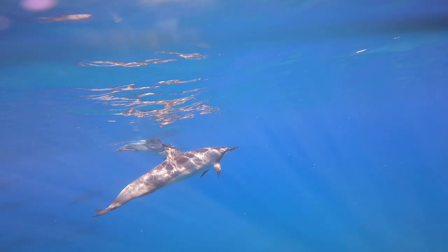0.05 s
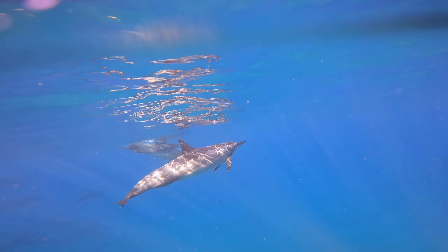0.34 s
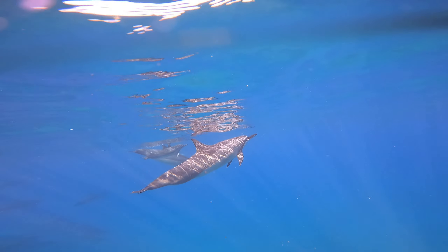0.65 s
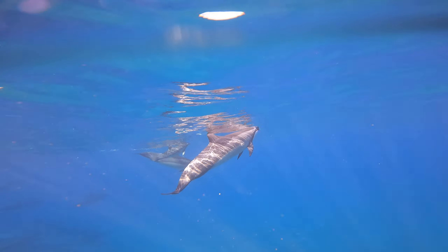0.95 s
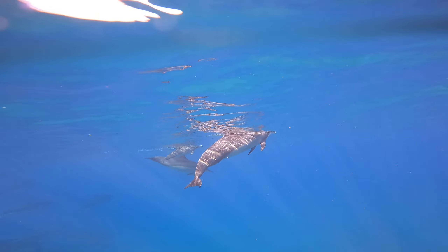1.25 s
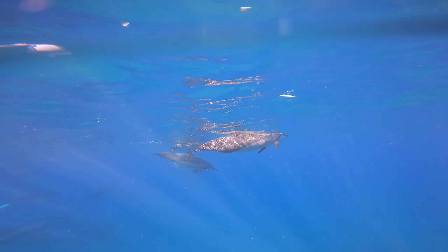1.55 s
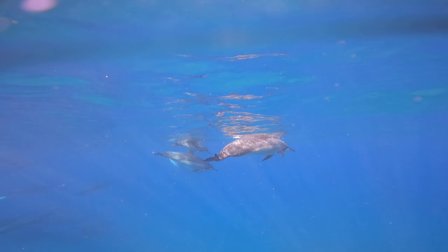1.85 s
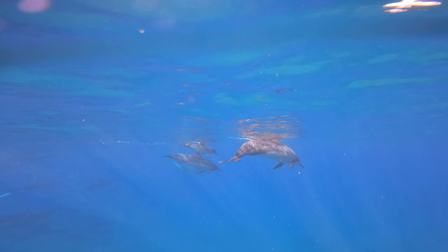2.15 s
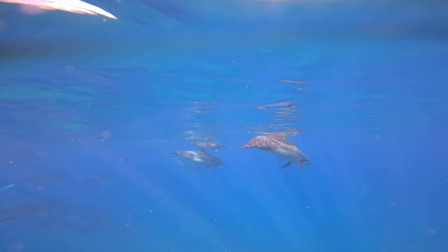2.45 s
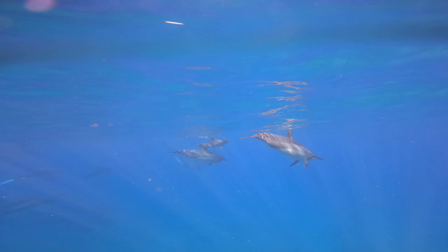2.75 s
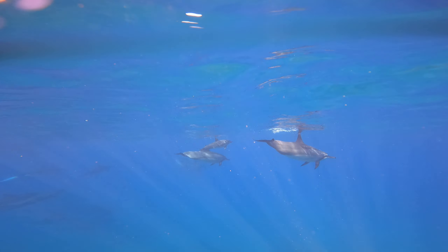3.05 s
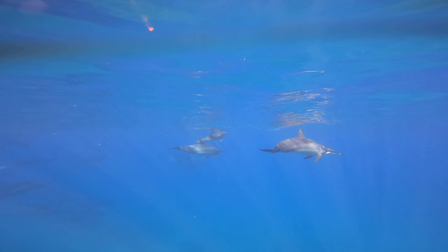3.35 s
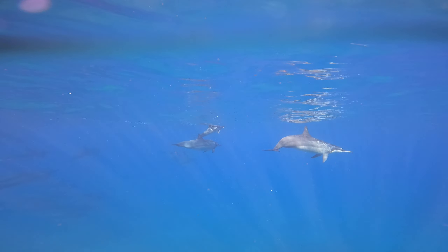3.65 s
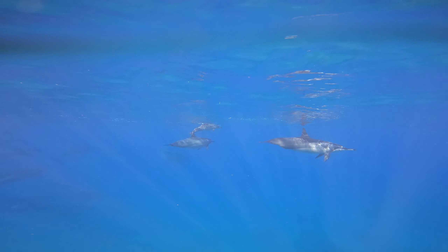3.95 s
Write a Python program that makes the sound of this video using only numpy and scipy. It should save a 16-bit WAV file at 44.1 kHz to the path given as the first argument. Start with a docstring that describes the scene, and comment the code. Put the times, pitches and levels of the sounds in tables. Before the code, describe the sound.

Dolphins whistle and click underwater over a low rumble of moving water.

```python
"""Dolphins just under the surface

Open water, heard from two microphones in a camera housing held just below the sea surface.
Passing dolphins whistle in upward sweeps, buzz twice and send out a train of sonar clicks.
Water rumbles, washes and knocks round the housing; snaps and bubbles crackle near and far.
At the end a splash breaks close by."""
import sys
import numpy as np
from scipy import signal
from scipy.fft import rfft, irfft, next_fast_len
from scipy.io import wavfile
from scipy.ndimage import uniform_filter1d

SR = 44100
rng = np.random.default_rng(int(sys.argv[2]) if len(sys.argv) > 2 else 0)


def file_out(sig):
    """Save sig as 16-bit WAV at sys.argv[1]."""
    # one column per channel
    cols = np.atleast_2d(sig).T
    # limit, then scale
    lim = np.clip(cols, -1, 1)
    pcm = np.round(lim * 32767).astype(np.int16)
    wavfile.write(sys.argv[1], SR, pcm)


N = 176400
T = np.arange(N) / SR


def from_db(db):
    """Decibels to gain."""
    return 10 ** (np.asarray(db) / 20)


def unit_rms(x):
    """Scale to unit rms."""
    return x / np.sqrt(np.mean(x ** 2) + 1e-20)


def in_time(rows):
    """Each column of a curve after time_s, sample by sample."""
    time_s, *columns = np.transpose(rows)
    return [np.interp(T, time_s, column) for column in columns]


def gate(rows, edge_s=.003):
    """Open from the first to the last point of a curve, with soft edges."""
    inside_s = np.minimum(T - rows[0][0], rows[-1][0] - T)
    return np.clip(inside_s / edge_s + .5, 0, 1)


def colour(x, points, share=1):
    """Minimum-phase filter that follows a freq_hz, gain_db curve, its decibels scaled by share."""
    size = next_fast_len(x.shape[-1] + 4096, real=True) * 2
    hz, db = np.transpose(points)
    grid_hz = np.maximum(np.arange(size // 2 + 1) * SR / size, 1)
    gain = from_db(share * np.interp(np.log(grid_hz), np.log(hz), db))
    cepstrum = irfft(np.log(gain))
    cepstrum[1:size // 2] *= 2  # fold onto positive time, so nothing rings before its cause
    cepstrum[size // 2 + 1:] = 0
    return irfft(rfft(x, size) * np.exp(rfft(cepstrum)))[..., :x.shape[-1]]


def drift(rate_hz):
    """Random wandering of spread 1, mostly slower than rate_hz."""
    hz = np.arange(N // 2 + 1) * SR / N
    return unit_rms(irfft(rfft(rng.standard_normal(N)) / (1 + (hz / rate_hz) ** 2) ** 2, N))


def stereo_noise(side_db=-10):
    """White noise shared by both microphones, plus a weaker opposed part."""
    mid, side = rng.standard_normal((2, N))
    return mid + from_db(side_db) * np.array([side, -side])


def impulses(rows):
    """One impulse for each row of start_s, level_db."""
    start_s, level_db = np.transpose(rows)
    return np.bincount(np.clip(start_s * SR, 0, N - 1).astype(int), from_db(level_db), N)


def soften(x, cutoff_hz):
    """A low-pass rounds off sharp blows."""
    return signal.sosfilt(signal.butter(2, cutoff_hz, fs=SR, output="sos"), x)


def ring(x, pitch_hz, t60_s):
    """One resonance: a unit impulse starts a dying sine of height 1."""
    decay, step = from_db(-60 / (t60_s * SR)), 2 * np.pi * pitch_hz / SR
    return signal.lfilter([0, np.sin(step)], [1, -2 * decay * np.cos(step), decay * decay], x + 1e-18)


def scatter(hits, t60_s):
    """Many paths through water and housing smear each impulse into a short dying burst."""
    decay = from_db(-120 / (t60_s * SR))
    power = signal.lfilter([1], [1, -decay], hits ** 2 + 1e-20)
    return np.sqrt(power) * stereo_noise()


# Lean of each band between the microphones, positive to the left: freq_hz, tilt_db
HOUSING_TILT = [(800, 4.5), (1080, -23), (1350, 7), (3500, 8), (4200, -8), (5600, -1.5), (6950, 1.5),
                (9000, 2.5), (9700, 15), (12000, -3.5)]


def housing(x):
    """The two microphones hear the housing differently: each takes a share of the tilt."""
    left = colour(x[0], HOUSING_TILT, share=0.47)
    right = colour(x[1], HOUSING_TILT, share=-0.3)
    return np.array([left, right])


# Spectrum of the distant sea, all round: freq_hz, gain_db
SEA_SPECTRUM = [(950, -15.5), (1200, -7.5), (1750, -5), (2080, -14), (2350, -10.5), (2780, -13), (3000, -7),
                (3250, -11.5), (4050, -9.5), (4650, 0.5), (5000, 0), (5300, -9), (6200, -3), (6950, -4),
                (7400, -9.5), (8300, -16), (9650, -20.5), (10500, -30.5), (12200, -30), (15500, -66)]


def sea():
    """Countless far snaps make a crackle over a smooth fizz, both fading slightly."""
    snaps_per_s, spread_db, fade_db_per_s = 320, 7, 0.45
    hits = rng.random(N) < snaps_per_s / SR
    strength = from_db(spread_db * np.minimum(rng.exponential(1, N), 2))
    crackle = from_db(-60) * unit_rms(colour(scatter(hits * strength, t60_s=0.028), SEA_SPECTRUM))
    fizz = from_db(-61.5) * unit_rms(colour(stereo_noise(), SEA_SPECTRUM))
    return (crackle + fizz) * from_db(-fade_db_per_s * (T - T.mean()))


# Swell of the eddies right on the housing: time_s, level_db
RUMBLE_SWELL = [(.14, -33), (.35, -25.5), (.6, -33.5), (1.0, -29), (1.24, -33.5), (1.36, -24.5),
                (1.48, -33.5), (1.57, -21.5), (1.7, -21.5), (1.95, -34), (2.17, -28), (2.63, -28.5),
                (3.25, -30), (3.66, -26.5), (3.8, -31.5)]
# Spectrum of their rumble: freq_hz, gain_db
RUMBLE_SPECTRUM = [(12, -31.5), (24, -2), (35, -2), (60, -18), (150, -48), (1500, -140)]
# Spectrum of the churn just above it in pitch: freq_hz, gain_db
CHURN_SPECTRUM = [(65, 0), (115, -5.5), (155, -25.5), (1500, -120)]


def eddies():
    """Eddies press on the housing: a deep swelling rumble and a steady churn, both nearly mono."""
    pressure = colour(stereo_noise(side_db=-33.5), RUMBLE_SPECTRUM)
    pressure /= np.sqrt(uniform_filter1d(pressure[0] ** 2, size=11000))  # level out over 0.25 s
    swell_db, = in_time(RUMBLE_SWELL)
    rumble = from_db(swell_db + 0.5) * pressure
    churn = from_db(-43) * unit_rms(colour(stereo_noise(side_db=-33.5), CHURN_SPECTRUM))
    return rumble + churn


# Water washing past, close to the microphones: time_s, level_db
WASH_SWELL = [(.45, -67), (.66, -58), (1.3, -53.5), (1.51, -66), (1.58, -53), (2.12, -54), (2.35, -65),
              (3.5, -61)]
# Its hollow spectrum: freq_hz, gain_db
WASH_SPECTRUM = [(160, -5.5), (250, -4), (320, 2), (415, 1.5), (462, -15), (700, -31.5), (5000, -100)]


def wash():
    """Water slides round the housing in lumps, gurgling more unevenly as it weakens."""
    swell_db, = in_time(WASH_SWELL)
    depth_db = 2.5 + 0.31 * (swell_db.max() - swell_db)
    gurgle_db = depth_db * np.minimum(drift(rate_hz=18), 1)
    flow = unit_rms(colour(stereo_noise(side_db=-10.5), WASH_SPECTRUM))
    return from_db(swell_db + gurgle_db) * flow


# Dolphin whistles, a little left of centre, one curve each: time_s, pitch_hz, level_db
WHISTLE_CURVES = [
    [(.119, 7400, -53.5), (.14, 7610, -54), (.186, 8700, -60), (.22, 9650, -68.5), (.278, 10850, -81),
     (.345, 12000, -73), (.402, 12600, -88)],
    [(.752, 9700, -58), (.766, 9900, -66), (.787, 12500, -77), (.838, 15300, -90)],
    [(.938, 7500, -56.5), (.962, 8100, -63), (.986, 8450, -60.5), (1.018, 9480, -63), (1.04, 10250, -83)],
    [(1.255, 6980, -62), (1.304, 8540, -58), (1.326, 9440, -68), (1.36, 10350, -72)],
    [(2.148, 9150, -64), (2.154, 9470, -54), (2.162, 11500, -76), (2.235, 15300, -86)],
    [(2.645, 5930, -54.5), (2.682, 8200, -64), (2.72, 9270, -67), (2.76, 10460, -81), (2.82, 12050, -76),
     (2.875, 12900, -90)],
]


def whistles():
    """Rising, wavering pure tones with a faint falling alias, roughened by echoes off the surface."""
    fold_hz, echo_decay_s, pan_db = 12000, 0.0086, 2
    waver_hz = 40 * drift(rate_hz=300)
    flutter = from_db(-0.5 + 2 * drift(rate_hz=150))
    tones = 0
    for curve in WHISTLE_CURVES:
        pitch_hz, level_db = in_time(curve)
        phase = 2 * np.pi * np.cumsum(pitch_hz + waver_hz) / SR
        sweep = from_db(level_db) * np.sin(phase)
        alias = from_db(-89) * np.sin(2 * np.pi * 2 * fold_hz * T - phase)  # mirrored about fold_hz
        tones += np.sqrt(2) * gate(curve) * flutter * (sweep + alias)
    paths = stereo_noise() * np.exp(-T / echo_decay_s)  # ripples overhead give many short paths
    echoes = signal.fftconvolve(tones[None], paths / np.linalg.norm(paths[0]), axes=1)[:, :N]
    return (tones + from_db(-6) * echoes) * from_db([[pan_db], [-pan_db]])


# Deep gulps of water round the housing: start_s, level_db
GULP_HITS = [(.228, -31.5), (.988, -30), (1.305, -37), (1.404, -32), (1.56, -34.5), (2.398, -38),
             (2.565, -29.5), (2.822, -32.5), (3.112, -31.5), (3.699, -27), (3.848, -30)]


def gulps():
    """Larger eddies give the housing a deep push that dies away quickly."""
    pushes = soften(impulses(GULP_HITS), cutoff_hz=238)
    return ring(pushes, pitch_hz=94, t60_s=0.11)


# Bubbles popping at the housing: start_s, level_db
POP_HITS = [(.2558, -49), (.5871, -52), (.6275, -45.5), (1.3269, -47.5), (1.7165, -43)]
# Spectrum of a pop: freq_hz, gain_db
POP_SPECTRUM = [(600, -34), (1300, -0.5), (1750, -0.5), (2100, -11.5), (3000, 3.5), (3300, -10),
                (12000, -37)]


def pops():
    """Each bubble pops in a short, dull burst."""
    return from_db(6.5) * colour(scatter(impulses(POP_HITS), t60_s=0.063), POP_SPECTRUM)


# Single snaps near the microphones: start_s, level_db
SNAP_HITS = [(.27, -46), (.362, -53), (.7956, -43.5), (1.0146, -46), (1.3399, -44.5), (1.3773, -41),
             (1.6122, -41.5), (1.737, -39), (1.7818, -47), (3.4271, -40.5)]
# Spectrum of a snap: freq_hz, gain_db
SNAP_SPECTRUM = [(1200, -32), (3700, -5.5), (4600, 6.5), (6600, 1.5), (9700, -18), (15000, -45)]


def snaps():
    """Sharp cracks, likely of shrimp, smeared on their way through the water."""
    return from_db(2.5) * colour(scatter(impulses(SNAP_HITS), t60_s=.02), SNAP_SPECTRUM)


# Buzzes of the passing dolphins, one curve each: time_s, level_db
BUZZ_CURVES = [
    [(.65, -67), (.665, -51), (.686, -70), (.70, -56), (.755, -55), (.778, -57)],
    [(2.02, -61), (2.075, -56.5), (2.12, -56), (2.133, -47.5), (2.148, -63)],
]
# Spectrum of the rasp round their main resonance: freq_hz, gain_db
RASP_SPECTRUM = [(4100, -34.5), (4600, -20.5), (5550, 4.5), (6900, 4.5), (8000, -19), (9700, -9),
                 (15000, -44)]


def buzzes():
    """Clicks so fast that they merge into a squeak, just before the two steepest whistles."""
    clicks_per_s = 750 * np.exp(0.089 * drift(rate_hz=60))
    cycles = np.cumsum(clicks_per_s) / SR
    pulses = np.diff(np.floor(cycles), prepend=0) * from_db(2 * drift(rate_hz=270))
    source = unit_rms(pulses) + from_db(-5.5) * unit_rms(scatter(pulses, t60_s=0.003))
    core = unit_rms(ring(source, pitch_hz=4690, t60_s=.018))
    rasp = from_db(-3) * unit_rms(colour(source, RASP_SPECTRUM))
    envelope = sum(from_db(in_time(curve)[0]) * gate(curve) for curve in BUZZ_CURVES)
    return envelope * (core + rasp)


# Tiny bubbles near the microphones: start_s, level_db
PLINK_HITS = [(1.4014, -54), (2.7488, -60), (2.771, -60), (2.9289, -61.5), (3.4273, -51)]


def plinks():
    """Short bursts set tiny bubbles ringing, all on one note."""
    bursts = scatter(impulses(PLINK_HITS), t60_s=0.063)
    return from_db(-15.5) * ring(bursts, pitch_hz=3020, t60_s=.018)


# Water knocking directly on the housing: start_s, level_db
KNOCK_HITS = [(1.708, -43), (1.786, -42), (1.841, -43.5), (2.672, -43.5), (2.695, -41.5), (2.732, -41)]
# Resonances that a knock sets off: pitch_hz, gain_db, t60_s
KNOCK_RESONANCES = [(196.6, 5.5, 0.064), (370, 2.5, 0.018)]


def knocks():
    """Soft, rounded blows of water ring two low modes in opposite polarity."""
    blows = soften(impulses(KNOCK_HITS), cutoff_hz=487)
    return sum((-1) ** k * from_db(gain_db) * ring(blows, pitch_hz, t60_s)
               for k, (pitch_hz, gain_db, t60_s) in enumerate(KNOCK_RESONANCES))


# Dolphin sonar clicks arriving at the housing: start_s, level_db
SONAR_HITS = [(2.339, -61), (2.389, -61), (2.491, -54), (2.729, -54), (2.8109, -50.5), (2.946, -54.5),
              (3.1193, -52), (3.2221, -53), (3.3219, -52), (3.3967, -53), (3.4486, -51.5), (3.4935, -55),
              (3.5364, -52.5), (3.5758, -53), (3.6152, -51.5), (3.6561, -54.5), (3.6965, -53),
              (3.7374, -54.5), (3.7808, -51.5), (3.8262, -51.5), (3.8706, -52)]
# Spectrum of a click: freq_hz, gain_db
SONAR_SPECTRUM = [(2000, -24), (5000, 8.5), (9500, 1.5), (10800, -8.5), (15000, -32)]


def sonar():
    """Very short bright ticks, each leaving a soft, hollow ping in the housing."""
    ping_hz, ping_lag_s = 1177, 0.002033
    hits = impulses(SONAR_HITS)
    ticks = colour(scatter(hits, t60_s=0.0046), SONAR_SPECTRUM)
    late_hits = np.interp(T - ping_lag_s, T, hits)
    pings = ring(scatter(late_hits, t60_s=.02), ping_hz, t60_s=0.0094)
    octave = signal.butter(2, [ping_hz / np.sqrt(2), ping_hz * np.sqrt(2)], "band", fs=SR, output="sos")
    return from_db(8) * housing(ticks) + from_db(-15) * signal.sosfilt(octave, pings)


# Spectrum of a splash at the surface, close by: freq_hz, gain_db
SPLASH_SPECTRUM = [(410, 10), (540, 2), (1250, 6), (3000, 5), (3500, -5), (4600, -3), (7500, -14.5),
                   (15000, -40)]


def splash():
    """The surface breaks: a pocket of air thumps under a rush of small bubbles."""
    start_s, attack_s, hold_s, fall_db_per_s = 3.926, 0.0046, 0.035, 159
    age_s = T - start_s
    rise = np.clip(age_s / attack_s, 0, 1)
    fall = from_db(-fall_db_per_s * np.maximum(age_s - hold_s, 0))
    rush = from_db(-39) * unit_rms(colour(stereo_noise(side_db=-6.5), SPLASH_SPECTRUM))
    thump = ring(impulses([(start_s, -19)]), pitch_hz=109.3, t60_s=0.1)
    return rise * fall * rush - thump


def scene():
    """Dolphins, sea and moving water as heard from inside the housing."""
    crackle_and_buzz = housing(buzzes() + snaps() + pops() + plinks() + sea())
    return crackle_and_buzz + sonar() + whistles() + eddies() + wash() + gulps() + knocks() + splash()


def record(dry):
    """The camera cuts the highest treble steeply."""
    stop_hz = 16200
    return signal.sosfilt(signal.cheby2(16, 70, stop_hz, fs=SR, output="sos"), dry)


dry = scene()
out = record(dry)
file_out(out)
```